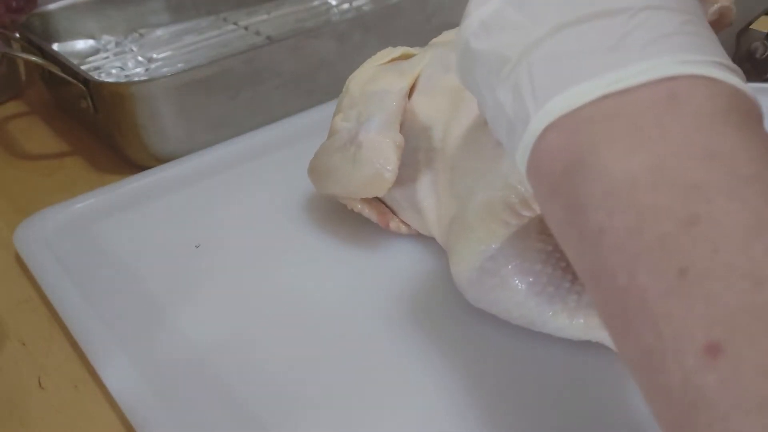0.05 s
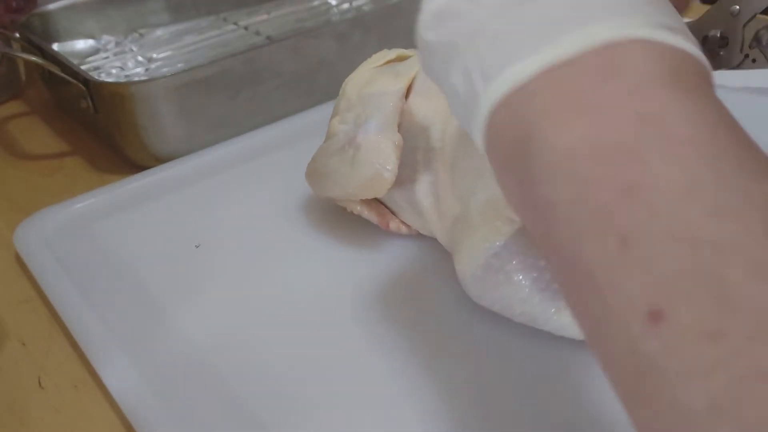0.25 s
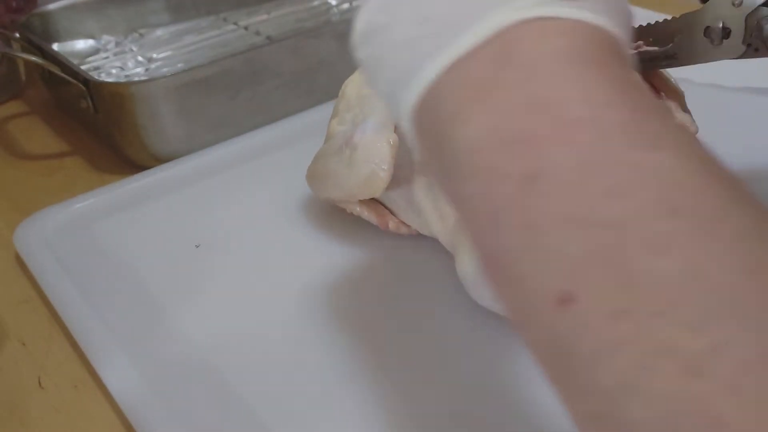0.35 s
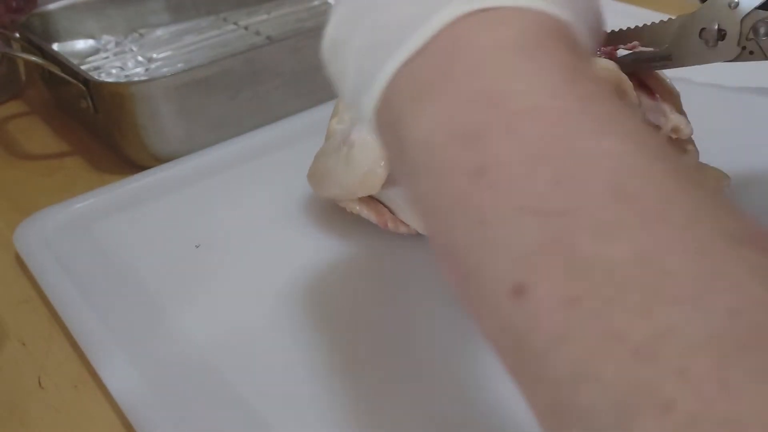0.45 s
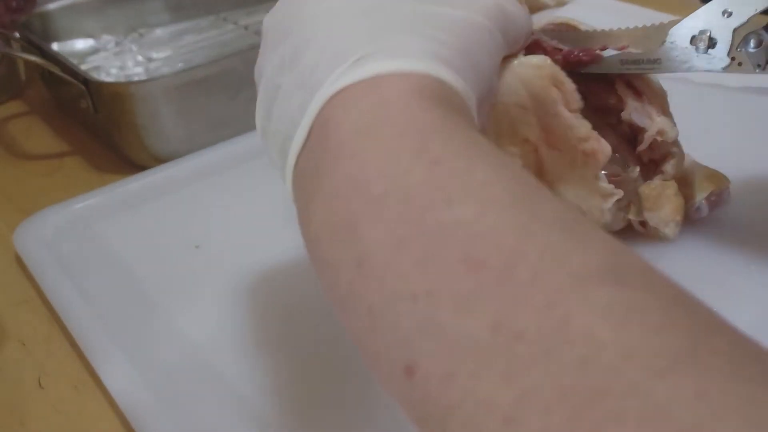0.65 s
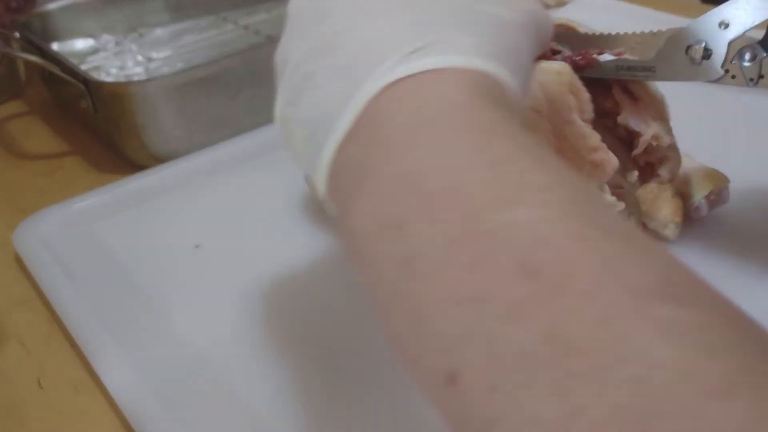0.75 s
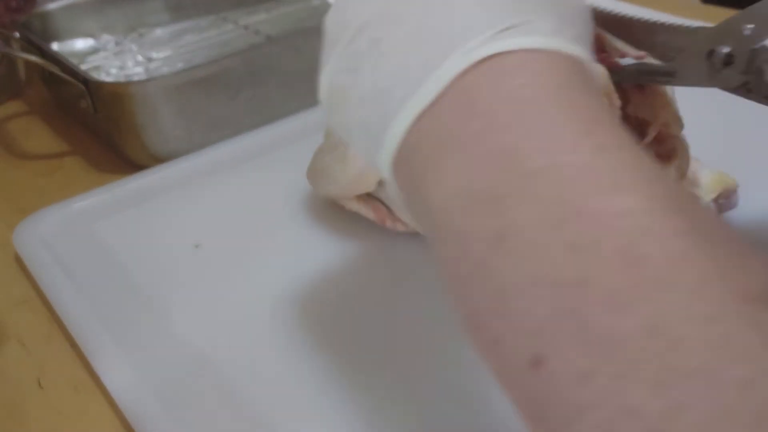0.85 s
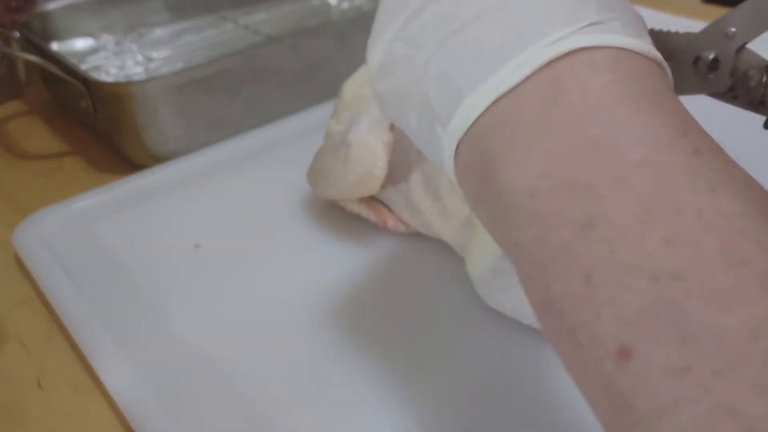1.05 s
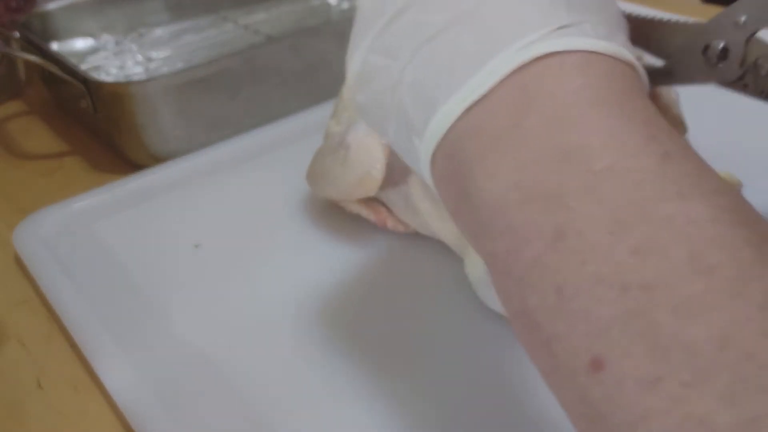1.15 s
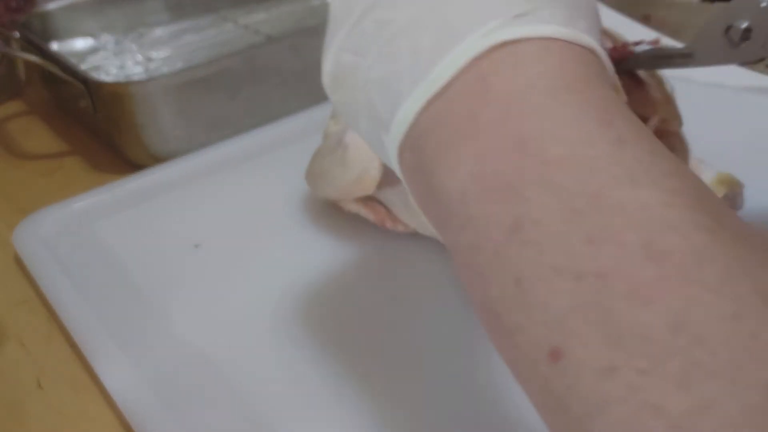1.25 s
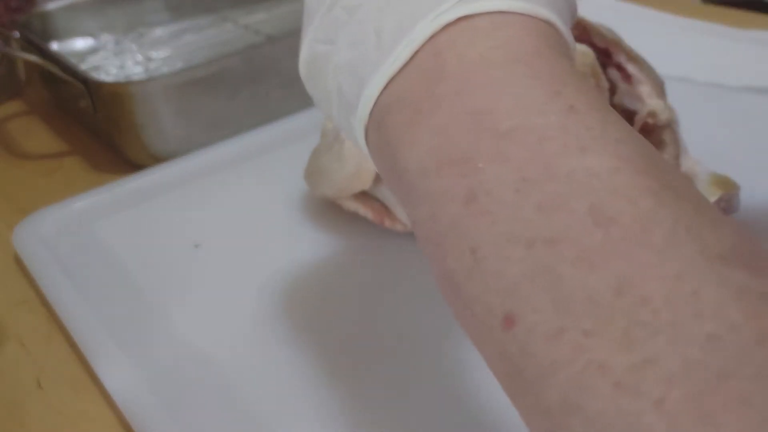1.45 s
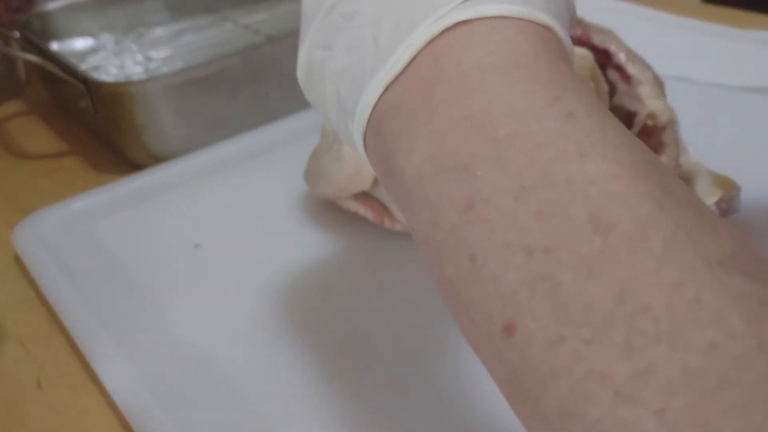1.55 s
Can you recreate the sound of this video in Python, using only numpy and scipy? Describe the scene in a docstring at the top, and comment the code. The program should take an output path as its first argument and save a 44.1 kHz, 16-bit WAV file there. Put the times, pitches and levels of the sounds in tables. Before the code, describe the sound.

Close shears crunch twice through raw chicken bone, with wet crackles and dull knocks on a plastic board. Smaller snips and scraping blades follow, then a few light handling ticks over a small kitchen's steady low rush.

```python
"""A small hard kitchen: shears cut a raw chicken on a plastic board, close by and a little to the right.
Over the room's steady low rush, gloves rub, wet meat crackles and pops, and the sliding blades rasp.
Shears and carcass knock dully on the board. Bone gives way in a double crunch and smaller snaps,
each a burst of tiny fractures that rings the piece and the steel. A few handling ticks follow."""
import sys
import numpy as np
from scipy import signal
from scipy.fft import rfft, irfft, next_fast_len
from scipy.io import wavfile

SR = 44100
rng = np.random.default_rng(int(sys.argv[2]) if len(sys.argv) > 2 else 0)


def store_pcm(level_fs):
    """Save levels as 16-bit WAV."""
    pcm = np.round(np.clip(level_fs, -1, 1) * 32767).astype(np.int16)
    wavfile.write(sys.argv[1], SR, np.atleast_2d(pcm).T)


N = 70560


def amp(db):
    """Decibels to gain."""
    return 10 ** (np.asarray(db) / 20)


def unit_rms(x):
    """Scale to rms 1."""
    return x / np.sqrt(np.mean(x ** 2) + 1e-20)


def unit_hit(x):
    """Scale each channel to the energy of 10 ms at rms 1."""
    return x / np.sqrt(np.sum(x ** 2, axis=-1, keepdims=True) / (SR / 100) + 1e-20)


def curve_at(points, hz):
    """Interpolate (freq_hz, value) points on a log frequency axis."""
    freqs_hz, values = np.transpose(points)
    return np.interp(np.log(hz + 1), np.log(freqs_hz + 1), values)


def pan(pan_db):
    """Stereo gains; pan_db is right over left."""
    return amp(np.array([[-pan_db / 2], [pan_db / 2]]))


def filtered(x, response):
    """Apply the gain response(hz) by FFT."""
    size = next_fast_len(N + SR // 2)
    return irfft(rfft(x, size) * response(np.fft.rfftfreq(size, 1 / SR)), size)[..., :N]


def add(track, start_s, sound):
    """Mix a sound in at start_s."""
    part = track[:, max(0, round(start_s * SR)):][:, :sound.shape[-1]]
    part += sound[..., :part.shape[1]]


# Rush spectrum: freq_hz, level_db
RUSH_SPECTRUM = [(25, -23.5), (60, -15), (170, -13), (250, -2.5), (360, -7.5), (470, -10.5), (650, -18.5),
                 (790, -16), (1100, -23), (2000, -24), (4000, -29), (6800, -32.5), (8000, -47.5),
                 (9500, -36.5), (12600, -30), (16000, -32.5)]
# Left-right likeness of the rush: freq_hz, correlation
RUSH_CORRELATION = [(60, 1), (300, .75), (700, 0.55), (1400, 0.033), (10000, .05)]

def room_rush(level_db=-60.5):
    """Steady low rush of the kitchen, alike on both sides in the bass."""
    def mid_side_gains(hz):
        angle = np.arccos(curve_at(RUSH_CORRELATION, hz)) / 2
        return amp(curve_at(RUSH_SPECTRUM, hz)) * [np.cos(angle), np.sin(angle)]
    mid, side = filtered(rng.standard_normal((2, N)), mid_side_gains)
    return amp(level_db) * pan(pan_db=1) * unit_rms(np.array([mid + side, mid - side]))


# Reverb decay: freq_hz, t60_s
REVERB_DECAY = [(200, 0.053), (800, 0.2), (2000, 0.22), (5500, 0.27), (9000, .3), (15000, 0.1)]
# Reverb spectrum at onset: freq_hz, level_db
REVERB_SPECTRUM = [(150, -14.5), (400, -4.5), (900, -5), (1300, -7), (2000, -2), (4000, -3), (6500, -3.5),
                   (8000, -3), (11000, -5), (15000, 1.5)]

def in_kitchen(direct, reverb_db=-8.5, predelay_s=0.0085):
    """Direct sound plus a fresh noise tail from the hard walls, fed by the right channel."""
    hz, t, spectra = signal.stft(rng.standard_normal((2, SR // 2)), SR, nperseg=256)
    decay_db = -60 * t / curve_at(REVERB_DECAY, hz)[:, None]
    colour_db = curve_at(REVERB_SPECTRUM, hz)[:, None]
    tail = signal.istft(spectra * amp(decay_db + colour_db), SR, nperseg=256)[1]
    tail /= np.linalg.norm(tail[0])
    tail = np.pad(tail, ((0, 0), (int(predelay_s * SR), 0)))
    out = amp(reverb_db) * pan(pan_db=2.5) * signal.fftconvolve(direct[1:], tail, axes=1)
    out[:, :direct.shape[1]] += direct
    return out


def rubbing(strokes, spectrum, slips_per_s, scatter_db, hiss_gain, ramp_s=0.0089):
    """Strokes of tiny random slips over a hiss."""
    t = np.arange(N) / SR
    envelope = np.zeros(N)
    for start_s, length_s, level_db in strokes:
        inside_s = np.minimum(t - start_s, start_s + length_s - t)
        envelope += amp(level_db) * np.clip(inside_s / ramp_s + 0.5, 0, 1)
    slips = (rng.random(N) < slips_per_s / SR) * amp(scatter_db * rng.standard_normal(N))
    crackle = unit_rms(slips * rng.standard_normal((2, N)))
    hiss = hiss_gain * rng.standard_normal((2, N))
    texture = unit_rms(filtered(crackle + hiss, lambda hz: amp(curve_at(spectrum, hz))))
    return in_kitchen(pan(pan_db=4.5) * envelope * texture)[:, :N]


# Grip shifts: start_s, length_s, level_db
GLOVE_STROKES = [(0.01, .21, -57)]
# Glove spectrum: freq_hz, level_db
GLOVE_SPECTRUM = [(30, -9), (120, -5), (260, 1.5), (600, -8), (1500, -18), (8000, -35.5)]

def glove_rub():
    """Gloved hands shift their grip with a low rustle."""
    return rubbing(GLOVE_STROKES, GLOVE_SPECTRUM, slips_per_s=1500, scatter_db=2.5, hiss_gain=0.8)


# Tissue pops: start_s, length_s, level_db
POP_BURSTS = [(0.355, .015, -33.5), (0.806, 0.045, -60.5), (0.985, 0.0099, -67)]
# Pop spectrum: freq_hz, level_db
POP_SPECTRUM = [(500, -16.5), (2500, -18.5), (6000, -13), (8000, -5), (9300, 9), (11000, -7), (16000, 2.5)]

def tissue_pops():
    """Tissue parts in sparse wet pops."""
    return rubbing(POP_BURSTS, POP_SPECTRUM, slips_per_s=170, scatter_db=3, hiss_gain=0.17)


# Meat movements: start_s, length_s, level_db
MEAT_STROKES = [(0.0, 0.54, -62.5), (0.222, 0.015, -31.5), (0.372, 0.039, -36.5), (0.815, 0.148, -61),
                (1.545, .055, -73.5)]
# Wet meat spectrum: freq_hz, level_db
MEAT_SPECTRUM = [(120, -21), (300, -10.5), (900, 3.5), (2000, -3), (4000, -1.5), (7000, 3), (8000, -12),
                 (9500, -6.5), (12000, -3), (16000, -3.5)]

def meat_squelch():
    """Wet meat crackles as it tears and shifts."""
    return rubbing(MEAT_STROKES, MEAT_SPECTRUM, slips_per_s=990, scatter_db=3, hiss_gain=1.0)


# Blade slides: start_s, length_s, level_db
RASP_STROKES = [(0.10, 0.2, -71), (0.190, 0.044, -48), (0.533, 0.072, -45.5), (0.663, 0.045, -49.5),
                (0.870, 0.061, -54), (1.079, 0.025, -56), (1.214, 0.014, -59)]
# Rasp spectrum: freq_hz, level_db
RASP_SPECTRUM = [(500, -27.5), (2000, -16.5), (4200, -15.5), (5800, -9), (6900, 0), (8000, -24),
                 (15000, -20.5)]

def blade_rasp():
    """The blades slide on each other in dense, uneven slips."""
    return rubbing(RASP_STROKES, RASP_SPECTRUM, slips_per_s=4900, scatter_db=8, hiss_gain=0.8)


# Shears and carcass on the board: start_s, pitch_hz, level_db, t60_s, pan_db
BOARD_KNOCKS = [(0.2310, 824, -38, 0.041, 18), (0.2569, 230, -45, 0.025, 9),
                (0.2565, 363, -31.5, 0.022, 11), (0.2570, 819, -36.5, 0.013, 18),
                (0.2590, 669, -41.5, 0.087, 5.5), (0.3805, 869, -34, 0.019, 6.5),
                (0.4290, 842, -44, 0.037, 7), (0.5460, 840, -42.5, 0.025, 8.5),
                (0.5900, 838, -52.5, 0.027, 16.5), (0.6195, 846, -34.5, 0.029, 3),
                (0.6735, 860, -49, 0.019, -4), (0.7015, 437, -38, 0.015, 8),
                (0.7025, 872, -37.5, 0.031, -2.5), (0.7890, 870, -59, 0.023, 0),
                (0.8890, 833, -61, 0.033, 8), (0.9240, 845, -55.5, 0.021, 7),
                (1.1050, 820, -46.5, 0.019, 6.5), (1.1055, 169, -58, 0.016, 8),
                (1.2150, 876, -59.5, 0.024, 6.5), (1.3770, 842, -59.5, 0.023, 9)]

def board_knocks(rise_s=0.0077, wall_delay_s=0.014, wall_db=-15.5):
    """A soft contact swells one damped mode, which a nearby wall throws back."""
    out, t = np.zeros((2, N)), np.arange(SR // 8) / SR
    swell = (1 - np.exp(-t / rise_s)) ** 2
    for start_s, pitch_hz, level_db, t60_s, pan_db in BOARD_KNOCKS:
        ring = unit_hit(np.sin(2 * np.pi * pitch_hz * t) * swell * amp(-60 * t / t60_s))
        add(out, start_s, in_kitchen(pan(pan_db) * amp(level_db) * ring))
        add(out, start_s + wall_delay_s, amp(level_db + wall_db) * ring)
    return out


def damped_mode(t, pitch_hz, t60_s):
    """Decaying sine with a random phase per channel."""
    phase = rng.normal(0, 1.0, (2, 1))
    return np.sin(2 * np.pi * pitch_hz * t + phase) * amp(-60 * t / t60_s)


# Steel blade modes: pitch_hz, level_db, t60_s
BLADE_MODES = [(1776, -7.5, .07), (2508, -12, .04), (3626, -12, 0.038), (3700, 1.5, 0.049),
               (4160, -4, 0.065), (5670, -9, 0.041), (6330, -9, .06), (6940, -7.5, 0.076)]

def blade_ring(t, scatter_db=2):
    """The struck blades ring, with a new balance of modes each time."""
    return unit_hit(sum(amp(rng.normal(level_db, scatter_db)) * damped_mode(t, pitch_hz, t60_s)
                        for pitch_hz, level_db, t60_s in BLADE_MODES))


# Crack bands: low_hz, high_hz
CRACK_BANDS = [(270, 680), (680, 1300), (1650, 3000), (3200, 5000), (5000, 7000), (7900, 14600)]
# Snaps of bone and blade: start_s, t60_s, pan_db, level_db in each of six bands, ring_hz, ring_db
BONE_SNAPS = [ (0.1882, 0.0075, 15, -52.5, -54, -58.5, -55.5, -50.5, -45.5, 6150, -54),
              (0.2307, 0.015, 9, -34.5, -36.5, -29.5, -29, -23.5, -23, 3790, -34),
              (0.236, 0.037, 1.7, -44, -35, -31.5, -30.5, -27, -28, 6220, -25),
              (0.2578, 0.011, 4.7, -37, -31.5, -28.5, -26.5, -25.5, -24.5, 2940, -33.5),
              (0.3140, 0.0049, 6.4, -82, -76, -69, -63, -63, -40, 12000, -52),
              (0.349, 0.03, 13.6, -55.5, -59.5, -54, -53, -51, -42.5, 3794, -45.5),
              (0.3810, 0.026, 7, -44.5, -44, -35.5, -43.5, -35.5, -27.5, 6597, -33),
              (0.5470, 0.011, 14.8, -58.5, -72, -54.5, -55, -36.5, -45, 2020, -49.5),
              (0.578, 0.032, 13, -61.5, -77, -77, -67, -50, -66, 5900, -44),
              (0.6194, 0.013, 9.6, -53, -60, -59, -55, -43, -50, 5340, -74),
              (0.6722, 0.0061, 9, -66, -68, -68, -55, -39, -64, 5700, -54),
              (0.7023, 0.013, 6.8, -50.5, -51, -42.5, -34, -32, -43.5, 2454, -35.5),
              (0.8637, 0.0038, 6, -90, -84, -83, -97, -61, -63, 9900, -64.5),
              (0.9620, 0.0059, 8, -78.5, -96, -63, -71.5, -90, -68, 2160, -85),
              (1.0807, 0.015, 6, -74.5, -83, -86, -81, -57, -66, 6650, -61),
              (1.1063, .022, 4.4, -64, -67.5, -65.5, -67, -72, -70, 1630, -61.5),
              (1.218, .030, 4.4, -61.5, -68.5, -64.5, -66, -63.5, -71, 4000, -64.5),
              (1.3800, .015, 3.9, -84, -71.5, -73, -79.5, -70, -76, 4440, -76),
              (1.4916, .004, 3.9, -77.5, -90.5, -85.5, -87, -77.5, -73.5, 9090, -75),
              (1.5381, .008, 8, -78, -77, -80, -71.5, -69, -85, 2844, -53),
              (1.552, .008, 6.4, -68, -72, -66.5, -64, -74, -81, 4000, -59)]

def bone_snaps(hold_s=0.0022, correlation=0.11, size_log_sigma=0.4, ring_t60_ratio=2.2, blade_db=-5):
    """Each snap is a few milliseconds of tiny fractures; the broken piece and the blades ring briefly."""
    out, t = np.zeros((2, N)), np.arange(SR // 10) / SR
    bandpasses = [signal.butter(4, band, 'band', fs=SR, output='sos') for band in CRACK_BANDS]
    for start_s, t60_s, pan_db, *bands_db, ring_hz, ring_db in BONE_SNAPS:
        fade = amp(-60 * np.maximum(t - hold_s, 0) / t60_s)
        shared = np.sqrt(correlation) * rng.standard_normal(len(t))
        separate = np.sqrt(1 - correlation) * rng.standard_normal((2, len(t)))
        fracture_sizes = rng.lognormal(0, size_log_sigma, len(t))
        burst = (shared + separate) * fracture_sizes * fade
        crack = sum(amp(level_db) * unit_hit(signal.sosfilt(bandpass, burst))
                    for bandpass, level_db in zip(bandpasses, bands_db))
        piece = amp(ring_db) * unit_hit(damped_mode(t, ring_hz, ring_t60_ratio * t60_s))
        steel = amp(bands_db[3] + blade_db) * blade_ring(t)  # relative to the 3.2-5 kHz band
        add(out, start_s, in_kitchen(pan(pan_db) * (crack + piece + steel)))
    return out


def scene():
    """Friction, snaps and knocks over the kitchen's rush."""
    friction = blade_rasp() + meat_squelch() + tissue_pops() + glove_rub()
    return friction + bone_snaps() + board_knocks() + room_rush()


# Microphone response: freq_hz, gain_db
MIC_RESPONSE = [(1000, -2), (11800, -1.5), (12600, -8), (16000, -3.5)]

def record(dry, cutoff_hz=16200, taper_hz=600):
    """The microphone dulls the top octave and keeps nothing above its band limit."""
    def response(hz):
        band_limit = np.clip((cutoff_hz - hz) / taper_hz + 0.5, 0, 1)
        return amp(curve_at(MIC_RESPONSE, hz)) * band_limit
    return filtered(dry, response)


dry = scene()
out = record(dry)
store_pcm(out)
```